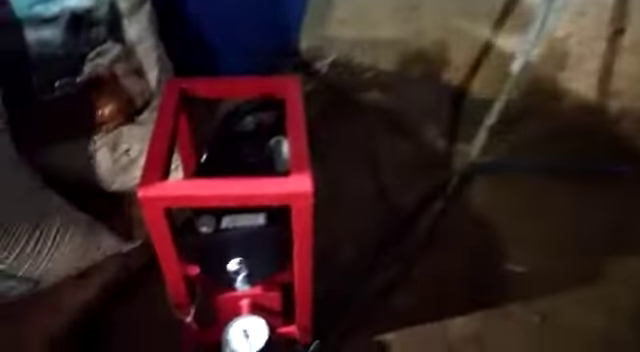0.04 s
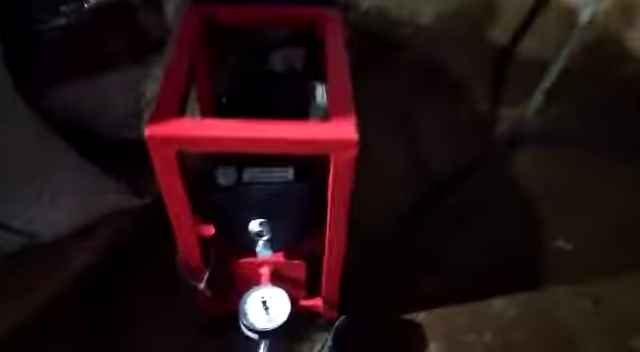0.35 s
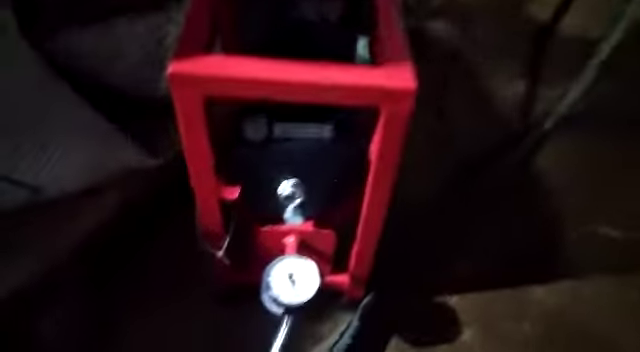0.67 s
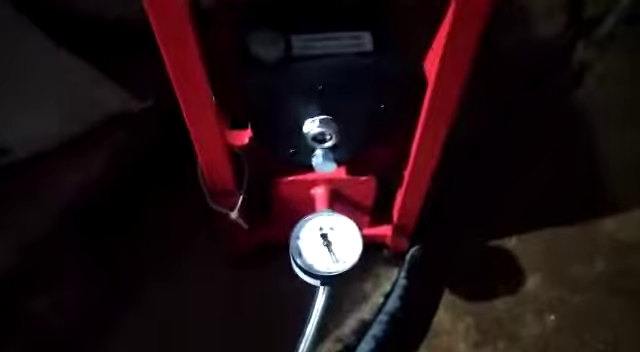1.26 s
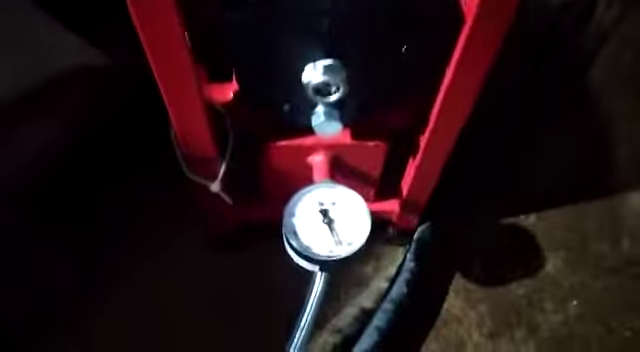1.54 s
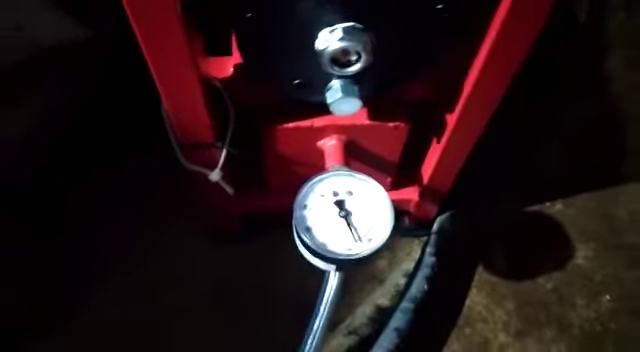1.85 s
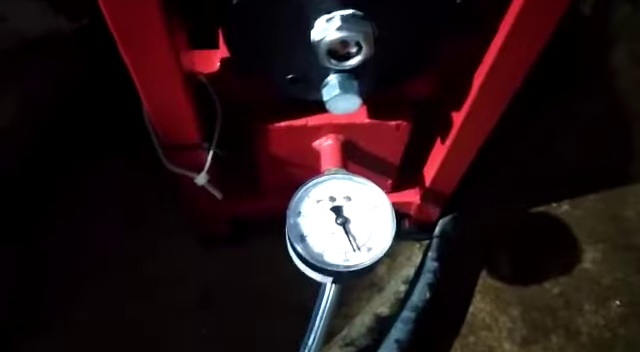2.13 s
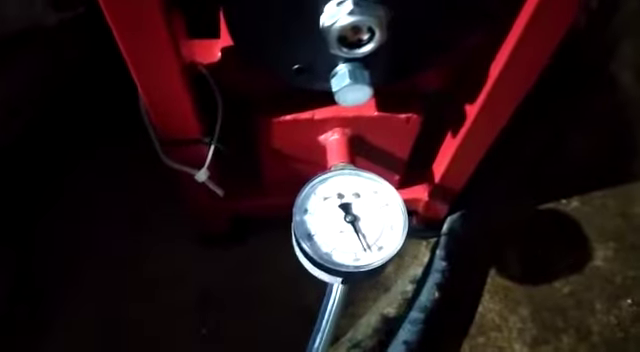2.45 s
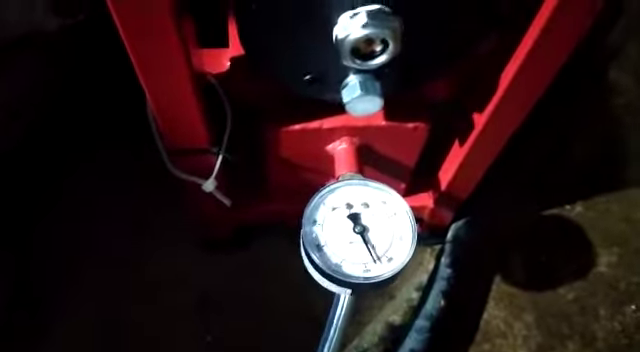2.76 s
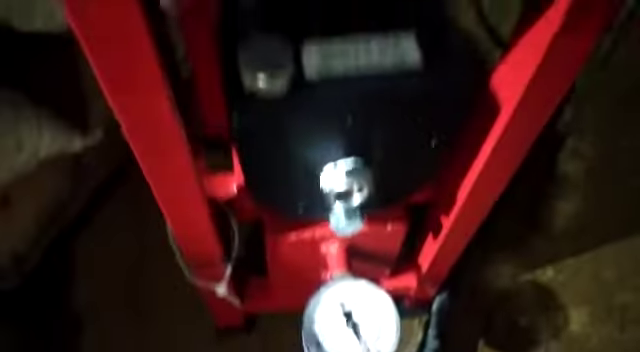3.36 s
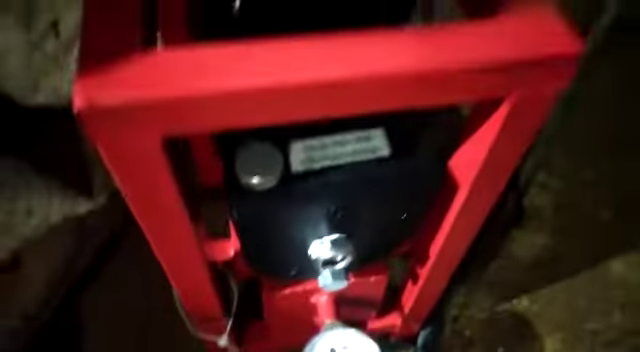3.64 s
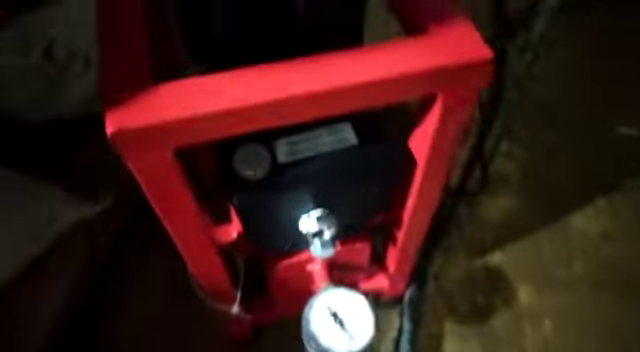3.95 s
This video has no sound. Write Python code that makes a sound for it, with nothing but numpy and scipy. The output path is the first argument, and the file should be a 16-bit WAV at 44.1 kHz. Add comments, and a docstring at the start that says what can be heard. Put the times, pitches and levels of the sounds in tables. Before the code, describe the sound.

A milking machine's vacuum pump hums and buzzes steadily in a small farm room while its pulsator clicks sharply, almost twice a second. Air hisses faintly, and the hum grows as the microphone moves closer, then eases slightly.

```python
"""A milking machine's vacuum pump hums in a small farm room.
An induction motor turns its shaft, and four vanes beat and churn the air on every turn.
Air hisses in at the regulator valve, and a soft, low rustle passes early on.
About every 0.58 s the pulsator, a sliding air switch, snaps over with a double click.
The microphone moves in close to the frame, then draws back a little."""
import sys
import numpy as np
from scipy import signal
from scipy.fft import rfft, irfft, next_fast_len
from scipy.io import wavfile

SR = 44100
rng = np.random.default_rng(int(sys.argv[2]) if len(sys.argv) > 2 else 0)


def generate_wav(signal):
    """Clip the signal to [-1, 1] and save it as 16-bit WAV at the path in sys.argv[1]."""
    frames = np.transpose(np.atleast_2d(signal))
    scaled = np.clip(frames, -1, 1) * 32767
    pcm = np.round(scaled).astype(np.int16)
    wavfile.write(sys.argv[1], SR, pcm)


N = 176400
SHAFT_HZ, VANES = 47.131, 4
EAR_PHASE_RAD = 0.52  # typical phase gap between the ears at 1 kHz


def amp(db):
    """Turn decibels into a gain."""
    return np.exp(np.asarray(db) * (np.log(10) / 20))

def unit(x):
    """Scale a sound to an average (rms) level of 1."""
    return x / np.sqrt(np.mean(x ** 2) + 1e-20)

def at_pitch(points, hz):
    """Read between a table's rows on a log pitch scale."""
    pitches, values = np.transpose(points)
    return np.interp(np.log(hz + 1), np.log(pitches + 1), values)

def over_time(points):
    """Join a table's timed values with straight lines."""
    return np.interp(np.arange(N) / SR, *np.transpose(points))

def pan(db):
    """Two gains that make the left ear louder by db."""
    return amp(np.array([[.5], [-.5]]) * db)

def wobble(per_s):
    """A smooth curve through per_s random values a second."""
    fine = signal.resample_poly(rng.standard_normal(int(N * per_s / SR) + 4), 16, 1)
    return np.interp(np.arange(N) * per_s / SR * 16, np.arange(len(fine)), fine)

def filtered(x, response):
    """Turn each frequency up or down by response(hz)."""
    n = x.shape[-1]
    padded = next_fast_len(n + 8192)
    return irfft(rfft(x, padded) * response(np.fft.rfftfreq(padded, 1 / SR)), padded)[..., :n]

def shaft_angle(t):
    """The shaft's speed ripples at the motor's slip beat and drifts a little."""
    slip_hz = 5.8
    speed_hz = SHAFT_HZ + 0.035 * np.sin(2 * np.pi * slip_hz * t) + .014 * wobble(2.005)
    return 2 * np.pi * np.cumsum(speed_hz) / SR

def vane_tone(angle, cycles_per_turn):
    """One tone of the hum; higher ones lag, waver and differ more between the ears."""
    khz = cycles_per_turn * SHAFT_HZ / 1000
    lag_rad = 8.5 * khz ** 2  # the housing delays the upper tones
    phase = cycles_per_turn * angle - lag_rad + 0.58 * rng.standard_normal()
    phase += 0.056 * khz * wobble(40)  # fast shimmer
    ear_shift = np.array([[.5], [-.5]]) * EAR_PHASE_RAD * khz ** 2 * (.5 * wobble(0.75) - 1)
    waver_db = 0.59 * khz * wobble(3.056)
    return np.sqrt(2) * amp(waver_db) * np.sin(phase + ear_shift)

# Tones of the vane beat: harmonic, near_db, far_db, near_pan_db, far_pan_db
VANE_TONES = [(1,-20.5,-23,0.9,-2), (2,-30,-41,-1,-3), (3,-20,-32.5,-2,4.5), (4,-22,-29,-5,10.5),
              (5,-27.5,-31.5,-5.5,2), (6,-37,-38.5,2,2), (7,-35.5,-45,2,-6), (8,-23,-38.5,1.5,1),
              (9,-34,-42.5,-16,1), (10,-34,-36,5,4.5)]
# Quiet and loud spots of the room's standing waves: harmonic, centre_s, half_width_s, gain_db
ROOM_SPOTS = [(2, 1.07, 0.35, -9), (3, .1, .2, -0.5), (4, .42, 0.18, 2.5), (4, 1.18, .27, -14.5),
              (8, .4, 0.19, 6), (9, .05, .2, 3), (9, 1.3, 0.18, -5), (9, 3.7, .25, -4), (10, 0.52, 0.11, 5),
              (10, 0.76, 0.22, -1.5), (10, 3.7, .3, 2.5)]
def pump_hum(t, angle, near):
    """The vanes' hum grows as the microphone nears; tones dip or swell at spots on the way."""
    hum = np.zeros((2, N))
    for harmonic, near_db, far_db, near_pan_db, far_pan_db in VANE_TONES:
        level_db = far_db + (near_db - far_db) * near
        for spot_harmonic, centre_s, half_width_s, gain_db in ROOM_SPOTS:
            if spot_harmonic == harmonic:
                level_db += gain_db * np.exp(-((t - centre_s) / half_width_s) ** 2)
        pan_db = far_pan_db + (near_pan_db - far_pan_db) * near
        hum += amp(level_db) * pan(pan_db) * vane_tone(angle, VANES * harmonic)
    return hum

# Weaker tones from unequal vanes: cycles_per_turn, near_db, pan_db
SHAFT_TONES = [(1,-74,0), (2,-59,0), (3,-45,2), (5,-41.5,-4), (6,-48,-11), (7,-40.5,-5), (9,-47,0),
               (10,-54,0), (11,-46,-5), (13,-38,-3), (14,-38,-7), (15,-34.5,0), (17,-42.5,3), (18,-44,0),
               (19,-38,10), (21,-38,-3), (22,-38,-9), (23,-38.5,-3), (26,-46.5,18), (27,-37,4.5),
               (29,-42.5,8), (30,-45,7), (31,-31.5,4), (33,-41,-3), (34,-55,-8), (35,-40,-9.5),
               (39,-41,8.5), (43,-50,5), (44,-42.5,8.5), (47,-40.5,-4), (51,-43,4)]
def shaft_buzz(angle, near):
    """Unequal vanes add a buzz that repeats every turn; the room mixes it differently near and far."""
    taken = [row[0] for row in SHAFT_TONES] + [VANES * row[0] for row in VANE_TONES]
    faint_tones = [(k, rng.normal(-49.5, 3), rng.normal(0, 3)) for k in range(37, 63) if k not in taken]
    turn = np.linspace(0, 2 * np.pi, 4096)

    def buzz_at_one_place():
        """Build one turn's sound and repeat it as the shaft spins."""
        cycle = 0
        for cycles_per_turn, level_db, pan_db in list(SHAFT_TONES) + faint_tones:
            khz = cycles_per_turn * SHAFT_HZ / 1000
            phase = rng.uniform(0, 2 * np.pi) + EAR_PHASE_RAD * khz ** 2 * rng.standard_normal((2, 1))
            cycle += np.sqrt(2) * amp(level_db) * pan(pan_db) * np.sin(cycles_per_turn * turn + phase)
        return np.array([np.interp(angle % (2 * np.pi), turn, ear) for ear in cycle])

    far_gain = amp(-7) * np.sqrt(1 - near)
    return near * buzz_at_one_place() + far_gain * buzz_at_one_place()

# How alike noise is in the two ears: pitch_hz, likeness_0_to_1
EAR_LIKENESS = [(50, 0.82), (500, 0.87), (1500, 0.28), (3000, 0.08), (9000, 0.04)]
def noise(colour, size=N):
    """Stereo noise at rms 1; colour says how strong each pitch is next to the others."""
    def response(hz):
        spread = np.arccos(at_pitch(EAR_LIKENESS, hz)) / 2
        return amp(at_pitch(colour, hz)) * [np.cos(spread), np.sin(spread)]

    mid, side = filtered(rng.standard_normal((2, size)), response)
    return unit(np.array([mid + side, mid - side]))

# Colour of the air churned in the pump: pitch_hz, gain_db
CHURN_COLOUR = [(20, -26), (45, -13), (75, -19), (170, -7), (300, -8), (450, -7), (680, -4.5), (950, -3),
                (1400, -5.5), (1900, -5.5), (2650, -9), (3300, -12.5), (5000, -45)]
def air_churn(vane_beat, near):
    """Churned air throbs with the vanes and is a little louder up close."""
    level_db = -33.8 - 3 * (1 - near)
    return amp(level_db) * (1 + 0.43 * vane_beat) * noise(CHURN_COLOUR)

def resonances(hz):
    """Gains for many narrow random peaks and dips, different in each ear."""
    pitches_hz = np.arange(0, SR / 2, 70)
    gains_db = rng.normal(0, 4, (len(pitches_hz), 2))
    return amp([np.interp(hz, pitches_hz, ear) for ear in gains_db.T])

# Colour of the wide hiss: pitch_hz, gain_db
HISS_COLOUR = [(1500, -18), (3200, -12), (3700, -1), (4500, -9), (4900, -0.5), (5200, -6), (5550, 0),
               (6100, -6), (7200, -2), (7900, 1.5), (8400, 1.5), (8850, 2), (9200, -4), (9550, -1),
               (9900, -14), (10400, -11.5), (11000, -11.5), (12100, -16), (12800, -16), (14500, -25),
               (15700, -32)]
# Loudness of the wide hiss: time_s, level_db
HISS_LEVEL = [(0, -34.5), (.8, -34.5), (1.5, -34), (2.1, -33), (2.7, -32), (3.2, -32.5), (3.65, -31.5),
              (4, -32.5)]
# Colour of a thin hiss near 5.5 kHz: pitch_hz, gain_db
THIN_COLOUR = [(3000, -54), (5100, -15), (5400, 4), (5650, 1), (5950, -15), (8000, -50)]
# Loudness of the thin hiss: time_s, level_db
THIN_LEVEL = [(0, -47), (1.4, -45), (1.85, -46), (2.3, -53), (3.1, -49), (3.6, -36), (4, -51)]
def regulator_hiss(vane_beat):
    """Air drawn through the valve hisses, flickers and throbs gently with the vanes."""
    def flickering(levels):
        return amp(over_time(levels) + .4 * wobble(8.9))

    wide = flickering(HISS_LEVEL) * unit(filtered(noise(HISS_COLOUR), resonances))
    thin = flickering(THIN_LEVEL) * noise(THIN_COLOUR)
    return (1 + 0.069 * vane_beat) * (wide + thin)

# Colour of the low rustle: pitch_hz, gain_db
RUSTLE_COLOUR = [(150, -37), (290, -13), (350, 2), (410, -5), (700, -35)]
def rustle(t, centre_s=0.55, half_width_s=.12, level_db=-40):
    """A brief, dull rustle swells and fades under the hum."""
    swell = np.exp(-((t - centre_s) / half_width_s) ** 2)
    return amp(level_db) * swell * noise(RUSTLE_COLOUR)

def click(colour, fade_s, delay_s=0, rise_s=0.00038):
    """One hit: noise that starts sharply and falls 60 dB in fade_s."""
    age_s = np.arange(SR // 2) / SR - delay_s
    attack = np.clip(age_s / rise_s, 0, 1)
    return noise(colour, len(age_s)) * attack * amp(-60 * abs(age_s) / fade_s)

# Colour of the slide snapping over: pitch_hz, gain_db
SNAP_COLOUR = [(800, -23), (1800, -15), (2400, 5), (3200, -8), (3900, 7), (4800, -1.5), (6300, -2.5),
               (7900, -2), (9000, -15), (10500, -17), (15000, -38)]
# Colour of the slide landing: pitch_hz, gain_db
LANDING_COLOUR = [(800, -22), (1700, -14), (2300, 5.5), (2750, 5.5), (3250, -7.5), (3900, 0), (5000, -11),
                  (6500, -7.5), (7900, 0.5), (9000, -22), (11000, -24), (15000, -44)]
# Strokes of the slide: start_s, snap_db, landing_db, landing_delay_s, pan_db
STROKES = [(.4478, -13.5, -16, 0.0049, -10), (1.0278, -16.5, -13.5, 0.006, 2),
           (1.6044, -13.5, -17, .0065, 1), (2.184, -15.5, -16, 0.0042, -1.5),
           (2.7615, -14, -15.5, .0055, -5), (3.341, -15, -13.5, 0.0043, -3),
           (3.9185, -14.5, -15.5, 0.0053, 2)]
def pulsator():
    """The slide snaps over and lands in its seat a few milliseconds later; the room answers."""
    out = np.zeros((2, N + SR))
    for start_s, snap_db, landing_db, landing_delay_s, pan_db in STROKES:
        snap = amp(snap_db) * click(SNAP_COLOUR, fade_s=0.026)
        landing = amp(landing_db) * click(LANDING_COLOUR, fade_s=0.036, delay_s=landing_delay_s)
        stroke = snap + landing
        start = round(start_s * SR)
        out[:, start:start + stroke.shape[1]] += pan(pan_db) * stroke + room_echo(stroke)
    return out[:, :N]

# Time the room's echo takes to fall 60 dB: pitch_hz, fade_s
ROOM_FADE = [(500, 0.33), (2500, .26), (5000, 0.25), (10000, 0.12)]
def room_echo(x, level_db=-0.5, delay_s=.003):
    """The walls throw the sound back; high pitches die away first."""
    hz, t, spectrum = signal.stft(rng.standard_normal((2, SR // 2)), SR, nperseg=256)
    fade = amp(-60 * t / at_pitch(ROOM_FADE, hz)[:, None])
    _, tail = signal.istft(spectrum * fade, SR, nperseg=256)
    tail /= np.linalg.norm(tail[0])
    tail = np.pad(tail, ((0, 0), (round(delay_s * SR), 0)))
    return amp(level_db) * signal.fftconvolve(x, tail, axes=1)[:, :x.shape[1]]

# The microphone's path toward the pump and partway back: time_s, nearness_0_to_1
MIC_PATH = [(0, 0.04), (.6, 0.04), (1, 0.38), (1.5, 0.61), (1.9, 0.82), (2.4, 0.94), (2.9, 0.98),
            (3.35, 0.89), (3.7, 0.68), (4, 0.45)]
def scene():
    """Add up all the sounds at the moving microphone."""
    t = np.arange(N) / SR
    near = over_time(MIC_PATH)
    angle = shaft_angle(t)
    vane_beat = np.cos(VANES * angle)
    pump = pump_hum(t, angle, near) + shaft_buzz(angle, near) + air_churn(vane_beat, near)
    return pump + regulator_hiss(vane_beat) + rustle(t) + pulsator()

def record(dry):
    """Cut off the very highest treble."""
    return filtered(dry, lambda hz: hz < 15750)

dry = scene()
out = record(dry)
generate_wav(out)
```